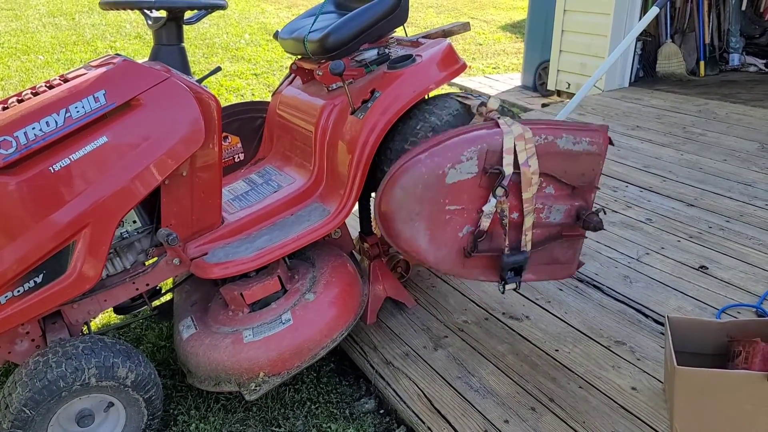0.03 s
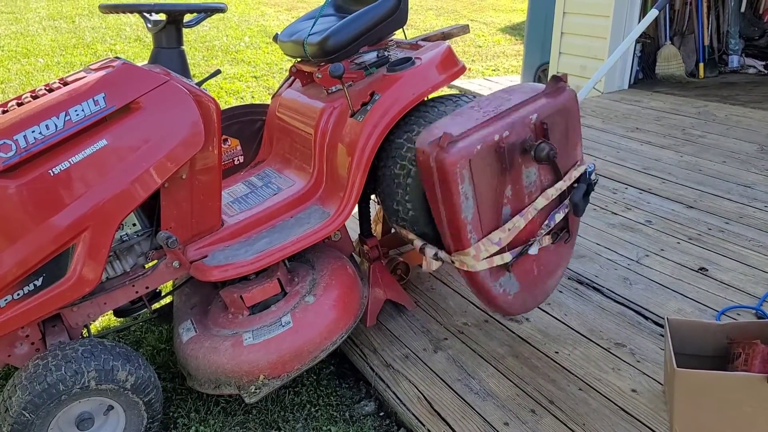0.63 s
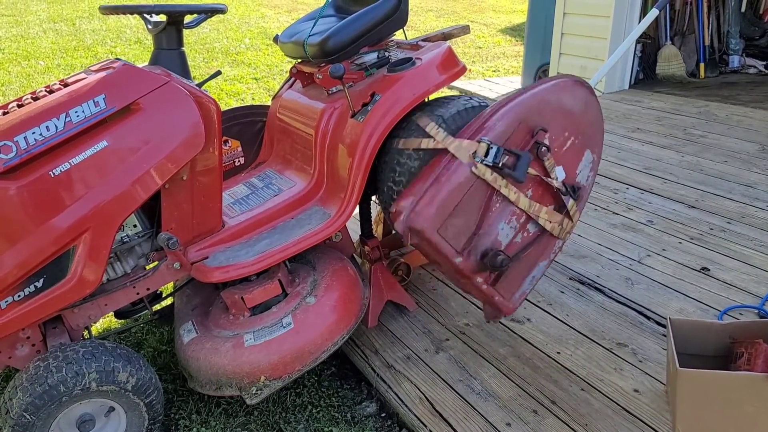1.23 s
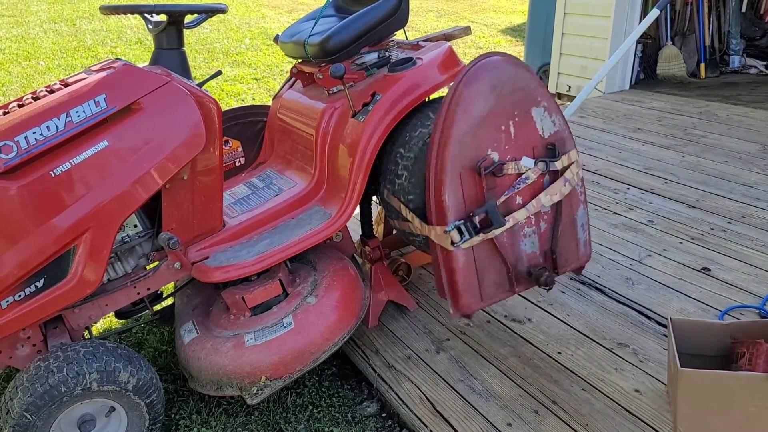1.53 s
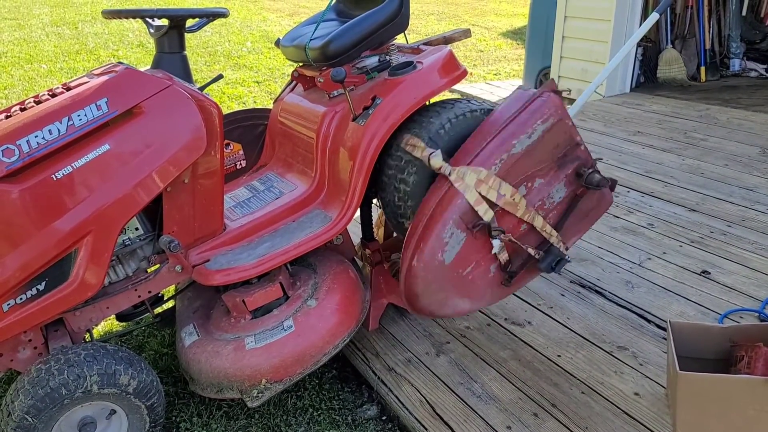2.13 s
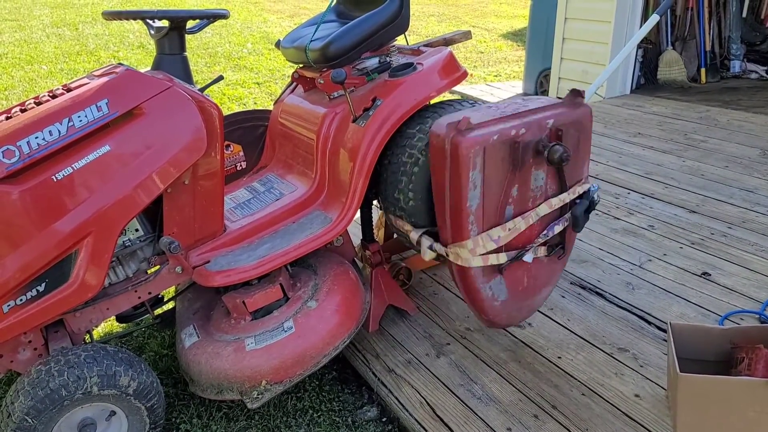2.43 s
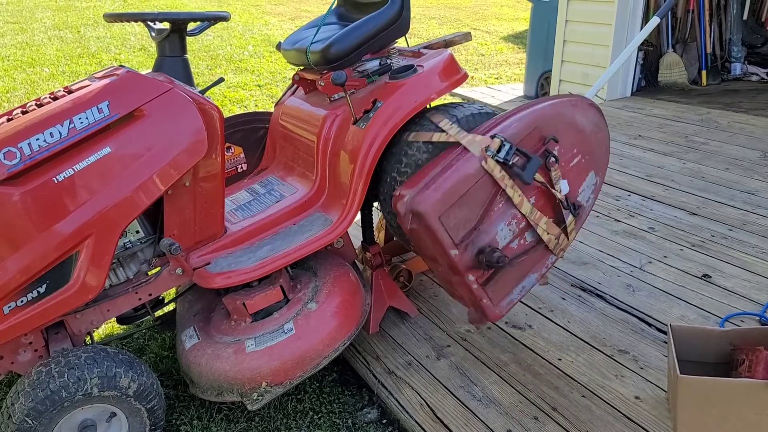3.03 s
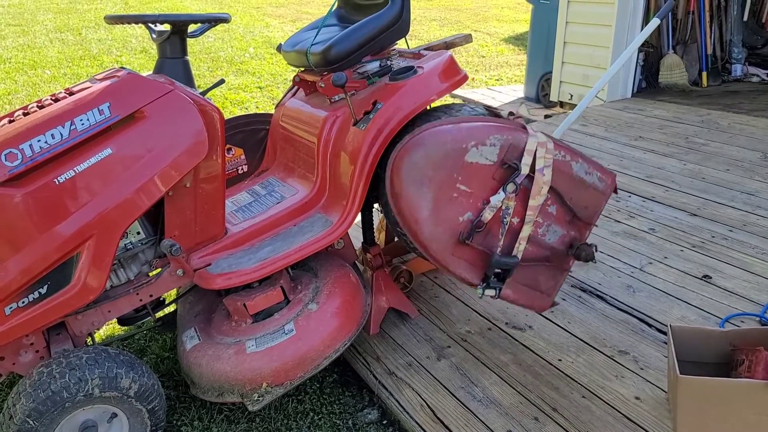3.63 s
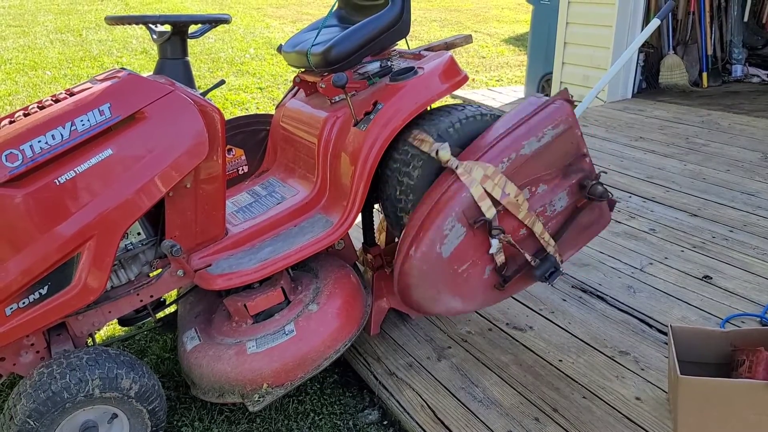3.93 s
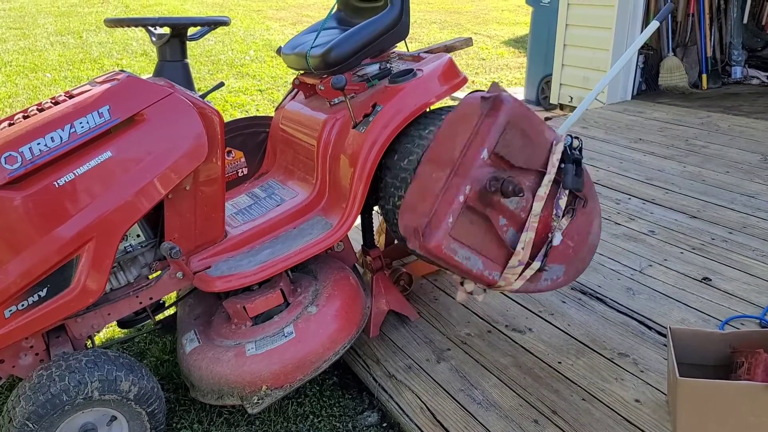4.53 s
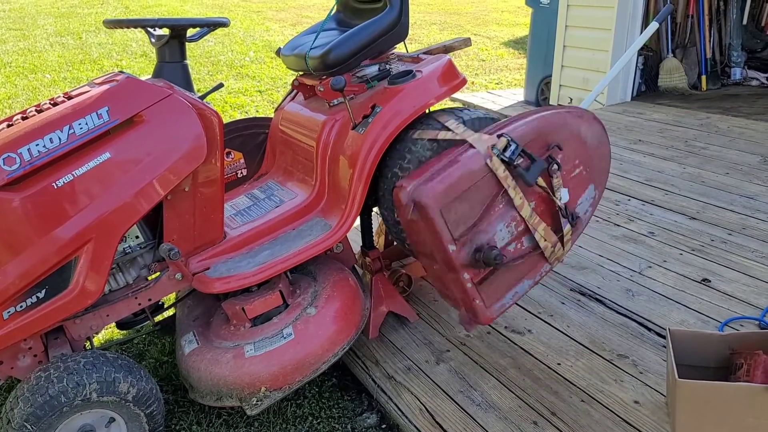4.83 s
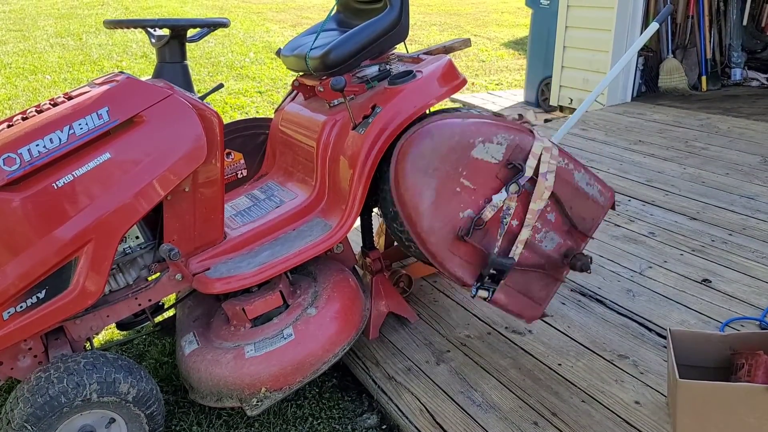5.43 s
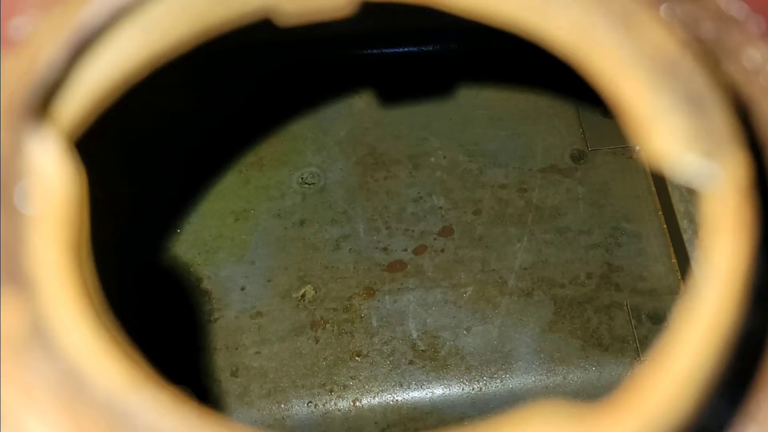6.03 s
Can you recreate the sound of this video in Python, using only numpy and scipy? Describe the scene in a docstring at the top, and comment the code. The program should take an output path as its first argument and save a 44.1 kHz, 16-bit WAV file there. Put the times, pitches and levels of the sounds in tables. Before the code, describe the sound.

A riding mower's single-cylinder engine idles outdoors, slightly to the left, with a fast low thudding and rattling metal panels. Straight ahead, metal pellets tumble inside a slowly turning steel fuel tank, sliding in bright hissing rushes and trickling in between. The pattern of rushes repeats about every two seconds. Both sounds carry on together, heard from nearby in stereo, then fade quickly at the end.

```python
"""A single cylinder thuds and clatters about 19 times a second, left of a pair of microphones: a riding
mower idling in gear, its firings pulsing through the silencer and its knocks ringing block and panels.
Straight ahead, a steel fuel tank full of metal pellets turns with the raised rear wheel it is strapped to.
The pellets slide down one wall after another in hissing rushes of tiny impacts, and trickle and roll
in between. The sound fades out at the end."""
import sys
import numpy as np
from scipy import signal
from scipy.fft import rfft, irfft
from scipy.io import wavfile
from scipy.ndimage import uniform_filter1d

SR = 44100
rng = np.random.default_rng(int(sys.argv[2]) if len(sys.argv) > 2 else 0)


def transcribe(signal):
    """Save signal, clipped to [-1, 1], as a 16-bit WAV file at the path in sys.argv[1]."""
    frames = np.atleast_2d(signal).T
    limited = np.clip(frames, -1, 1)
    pcm = np.round(limited * 32767).astype(np.int16)
    wavfile.write(sys.argv[1], SR, pcm)


N = 277389
TIME = np.arange(N) / SR
FFT_SIZE = 9 * 2 ** 15
FREQS = np.arange(FFT_SIZE // 2 + 1) * SR / FFT_SIZE
LEFT_RIGHT = np.array([[.5], [-.5]])  # splits a difference between the two microphones
FIRINGS_PER_TURN = 36  # geared to the engine, the tank turns once in about 1.85 s

# engine speed, wandering about its governed idle: t/s, firing rate/Hz
FIRING_RATE = [(0, 19.428), (1.25, 19.27), (1.65, 19.433), (2.55, 19.233), (3.2, 19.698), (5.05, 19.56),
               (5.45, 19.16)]
# response of the silencer: f/Hz, level/dB
SILENCER_RESPONSE = [(19, -63), (39, -12), (58, -7), (78, 1.5), (97, -0.3), (117, -8), (136, -3.5),
                     (156, 1), (175, -2.5), (195, -4), (214, -8.5), (233, -4.5), (248, -26), (600, -58.5)]
# lead of the left microphone on the engine: f/Hz, phase/rad
LEFT_MIC_LEAD = [(20, 17), (40, 0.45), (180, 0.39), (400, 0.62), (700, 0.69), (950, 1.92), (1500, 4.57),
                 (3000, 4.8)]

# the heap's slides in every turn: position/turn, level/dB, swell/s, hold/s, decay/s
HEAP_SLIDES = [(0.028, -20.5, 0.019, 0.23, 0.03), (0.098, -23, 0.0052, 0.035, 0.016),
               (0.304, -38.5, 0.036, 0.35, .05), (0.505, -19, 0.023, 0.24, 0.04),
               (.665, -15.5, .018, .035, .014), (.9, -25, .045, 0.11, .02),
               (0.963, -16.5, 0.027, 0.062, 0.048)]
# clumps of pellets dropping on a wall: t/s, level/dB, scatter time/s
CLUMP_DROPS = [(0.204, -13, 0.031), (.305, -17.5, 0.0098), (0.365, -23.5, 0.0088), (.54, -27, .01),
               (.590, -29, 0.012), (.866, -23, 0.033), (0.941, -17.5, 0.0066), (1.08, -21.5, 0.039),
               (1.16, -23, 0.02), (1.234, -15.5, 0.018), (1.398, -19.5, 0.018), (1.53, -28, 0.011),
               (1.63, -25, 0.063), (1.783, -17.5, 0.017), (1.84, -22.5, 0.018), (2.060, -10, 0.0083),
               (2.103, -13, 0.01), (2.159, -16, 0.011), (2.268, -23, 0.0054), (2.597, -26, 0.0069),
               (2.631, -21, 0.005), (2.729, -23.5, 0.005), (2.798, -31, 0.027), (2.977, -14.5, 0.0063),
               (3.035, -22.5, 0.01), (3.079, -17.5, 0.016), (3.251, -17.5, 0.012), (3.396, -26.5, 0.0079),
               (3.48, -28.5, 0.037), (3.68, -22.5, 0.034), (3.914, -14.5, 0.027), (4.012, -18, 0.015),
               (4.270, -29, 0.0073), (4.43, -27.5, 0.017), (4.615, -23, 0.026), (4.92, -21, 0.038),
               (5.081, -21.5, 0.02), (5.293, -27, 0.015), (5.451, -18, 0.016)]
# ring of the tank at each microphone: f/Hz, left level/dB, right level/dB
TANK_RESPONSE = [(353, -1, -6), (790, -1.5, -14.5), (1050, -13, 1.5), (1640, 0.5, 0), (2400, 1, -0.5),
                 (3240, 1.5, 2), (4270, -1, 0), (5410, 1.5, 3), (7200, -1, 6.5), (7700, 0, -3.5),
                 (9380, 0, -1), (9930, -1, 2), (13200, 0.5, 2), (15570, -3, 0)]
# hollow modes of the tank: f/Hz, width/Hz, level/dB
TANK_HOLLOW_MODES = [(1603, 24, -0.5), (1684, 44, 2.5), (1734, 13, 3.5), (1823, 19, -1.5)]
# the hollow ring grows as the heap runs over a flat wall: position/turn, level against the hiss/dB
HOLLOW_LEVEL = [(.08, -18), (.27, -5.5), (.55, -11), (.85, -28.5)]
# bright modes of the tank's seam: f/Hz, width/Hz, level/dB
TANK_SEAM_MODES = [(6770, 360, -11), (6830, 140, 16.5)]
# the seam sings when the heap first strikes a wall: position/turn, level against the hiss/dB
SEAM_LEVEL = [(.1, -22.5), (.44, -9.5), (.51, -7), (.59, -23), (.71, -28), (.76, -6), (.83, -28),
              (.98, -7.5)]

# knocks of piston, valves and gears: position/cycle, level/dB
CYCLE_KNOCKS = [(.01, -2), (.105, -0.5), (0.302, -4.5), (.405, 0), (.5, -3), (0.705, -7.5), (0.82, 0.5),
                (.87, 3.5), (0.945, -3)]
# response of the engine block and its covers: f/Hz, level/dB
BLOCK_RESPONSE = [(170, -24), (270, 6.5), (360, 3.5), (460, -1.5), (720, -5), (890, -4.5), (980, -14.5),
                  (1110, -13), (1330, -1.5), (1450, -16), (1610, -4.5), (2000, -16.5), (4000, -29),
                  (14000, -44)]
# the clatter across the microphones: f/Hz, left minus right level/dB
CLATTER_BALANCE = [(380, 7.5), (540, 10), (740, 7), (900, 0), (1300, 5), (1600, -0.5), (2000, -1.5)]
# modes of the mower's panels: f/Hz, width/Hz, level/dB
PANEL_MODES = [(557, 14, -1), (624.8, 38, -4), (683, 66, -4.5), (739.5, 40, -7.5), (807, 31, -14.5),
               (851, 5, -11.5), (857, 120, -5.5)]
# the panels' ring swells and sinks twice a turn: position/turn, level/dB
PANEL_LEVEL = [(.12, -29), (.35, -26.5), (.55, -24), (.72, -28), (.88, -25.5)]
# mode of one loose panel: f/Hz, width/Hz, level/dB
LOOSE_PANEL_MODE = [(721, 95, -3)]
# the loose panel rattles in swells: t/s, level/dB
RATTLE_LEVEL = [(0, -29.5), (.5, -28.5), (.72, -25.5), (1.15, -26.5), (1.4, -31.5), (2.25, -30),
                (2.48, -26), (2.88, -28.5), (3.22, -36), (3.42, -31), (3.9, -30.5), (4.6, -29), (5.0, -37),
                (5.33, -23.5), (5.6, -28.5)]
# modes of the tin shroud over the engine: f/Hz, width/Hz, level/dB
TIN_SHROUD_MODES = [(1220, 34, -12.5), (1292, 17, -0.5), (1312, 26, 1), (1399, 20, -0.5)]
# one knock harder than the rest: t/s, level/dB
HARD_KNOCK = [(2.504, -14.5)]

# the crankcase's even drone: f/Hz, level/dB
CRANKCASE_RESPONSE = [(200, -26.5), (250, -4), (272, -0.5), (310, -0.5), (332, 2), (352, -.5), (390, 3),
                      (430, -2.5), (480, -0.5), (515, -5), (560, 2), (600, 1), (660, -9.5), (900, -15.5),
                      (1050, -34.5)]
# ring of the wall under rolling pellets: f/Hz, level/dB
ROLLING_RESPONSE = [(1200, -1), (2300, 6), (2750, 8), (3000, 9.5), (3250, 6), (3400, 11), (3560, -4.5),
                    (3880, 3), (4450, 1.5), (5000, 5), (5430, 9.5), (5900, 2), (6800, 5), (7600, -5),
                    (11000, -1.5), (14000, -9.5), (15500, -14)]
# the rolling lulls whenever a slide has come to rest: position/turn, level/dB
ROLLING_LEVEL = [(.12, -31.5), (.24, -35), (.35, -32), (.6, -33.5), (.68, -43), (0.734, -35), (.88, -33)]
# closing fade: t/s, level/dB
FADE_OUT = [(5.6, -0.5), (5.66, -4.5), (5.70, -13.5), (5.735, -28), (5.76, -108), (5.8, -140)]


def exhaust(crank):
    """Each firing sends a pulse through the silencer, over a weak rumble of gas."""
    pulses = -each_cycle(crank, share=.09)  # the exhaust opens
    gas = undb(-16.5) * rng.standard_normal(N)
    return undb(-18.5) * unit(through(unit(pulses) + gas, causal(spectrum(SILENCER_RESPONSE))))


def sliding_pellets(crank):
    """Pellets strike the tank and ring its walls, hollow and seam; each microphone gets its own hiss."""
    power = pellet_flow(crank)
    impacts = pellet_impacts(power)
    walls = np.array([causal(spectrum(TANK_RESPONSE, column)) for column in (1, 2)])
    # the moving heap wakes now one hollow mode, now another
    hollow = sum(through(impacts, resonances([mode])) * undb(4.9 * walk(7))
                 for mode in TANK_HOLLOW_MODES)
    hollow = unit(hollow) * undb(each_turn(crank, HOLLOW_LEVEL))
    seam = unit(through(impacts, resonances(TANK_SEAM_MODES))) * undb(each_turn(crank, SEAM_LEVEL))
    hiss = unit(heap_damping(through(impacts, walls)))
    return (hiss + hollow + seam) * np.sqrt(np.mean(power)) * undb(2.1)


def pellet_flow(crank, clump_swell_s=.003):
    """Power of the moving pellets: each slide comes at its angle of the tank, and clumps drop on top."""
    turn = turns(crank)
    turn_s = FIRINGS_PER_TURN / curve(FIRING_RATE)
    power = undb(-42) ** 2  # a few pellets are always trickling
    for share, db, swell_s, hold_s, decay_s in HEAP_SLIDES:
        age = ((turn - share + .5) % 1 - .5) * turn_s
        envelope = np.exp(np.minimum(age, 0) / swell_s - np.maximum(age - hold_s, 0) / decay_s)
        power += undb(db) ** 2 * envelope
    power *= undb(1.3 * walk(45)) ** 2
    for start, db, scatter_s in CLUMP_DROPS:
        age = np.maximum(TIME - start, 0)
        power += undb(db) ** 2 * (1 - np.exp(-age / clump_swell_s)) * np.exp(-age / scatter_s)
    return power


def pellet_impacts(power, patches=12):
    """Thousands of tiny impacts on patches of tank wall; a faster flow brings more of them."""
    hits_per_s = 8000 * (power / undb(-18)) ** .58
    # the heap wanders from patch to patch, so the ring keeps changing
    shares = np.array([undb(9 * walk(5)) for _ in range(patches)])
    impacts = 0
    for share in shares / shares.sum(axis=0):
        hits = rng.random(N) < hits_per_s * share / SR
        sizes = rng.standard_normal(N) * undb(.88 * np.minimum(rng.exponential(size=N), 5))
        tail = .66 * ring(t60=.0011) + ring(t60=.085)  # a tick of contact, then the steel rings on
        impacts += strike(hits * sizes * np.sqrt(power / hits_per_s), tail)
    return impacts


def heap_damping(sound, depth_db=1.5, rate_hz=22, bands=32):
    """The heap damps ever different parts of the wall: each band swells and sinks by itself."""
    centres_hz = np.geomspace(1500, 14000, bands)
    return sum(through(sound, np.interp(FREQS, centres_hz, band)) * undb(depth_db * walk(rate_hz))
               for band in np.eye(bands))


def knocks_and_buzz(crank, buzz_decay_s=.0011):
    """Piston, valves and gears knock in every cycle; each blow sets the covers buzzing briefly."""
    knocks, blow_power = 0, 0
    for share, db in CYCLE_KNOCKS:
        blows = undb(db) * each_cycle(crank, share)
        knocks += strike(blows, ring(t60=.037, channels=1))
        blow_power += blows ** 2
    shake = np.sqrt(signal.lfilter([1], [1, -np.exp(-1 / (buzz_decay_s * SR))], blow_power))
    return unit(knocks), unit(shake * rng.standard_normal(N))


def clatter(crank, knock_cut_hz=545, noise_cut_hz=850):
    """Knocks, buzz and fan noise ring the block, the panels and the tin shroud."""
    knocks, buzz = knocks_and_buzz(crank)
    # fan noise and reflections off the deck reach each microphone separately
    fan = rng.standard_normal((2, N))
    deck = unit(strike(knocks[0], ring(t60=.058)))
    balance = undb(spectrum(CLATTER_BALANCE) * LEFT_RIGHT)
    knock_highpass = 1 / np.sqrt(1 + (knock_cut_hz / (FREQS + 1)) ** 20)
    noise_highpass = FREQS ** 3 / np.hypot(FREQS ** 3, noise_cut_hz ** 3)

    block_knocks = through(whiten(knocks + undb(2.5) * deck), knock_highpass)
    block_noise = through(undb(2) * buzz + undb(4.5) * fan, noise_highpass)
    block = through(undb(5) * block_knocks + block_noise, causal(spectrum(BLOCK_RESPONSE)) * balance)

    panel_knocks = through(whiten(knocks + undb(-5) * deck), knock_highpass)
    drive = panel_knocks + undb(-9) * buzz + undb(-12) * fan
    panels = through(drive, resonances(PANEL_MODES) * balance)
    loose_response = resonances(LOOSE_PANEL_MODE) * resonances([(730, 170, 0)])
    rattle = through(drive + undb(-8.5) * buzz, loose_response * balance) * undb(1.5 * walk(18))
    shroud = through(drive + buzz, resonances(TIN_SHROUD_MODES) * balance)
    return (undb(-23.5) * unit(block)
            + undb(each_turn(crank, PANEL_LEVEL)) * unit(panels)
            + undb(curve(RATTLE_LEVEL)) * unit(rattle)
            + undb(-36.5) * unit(shroud))


def hard_knock(decay_s=.01):
    """A single harder knock barks through the block and the loose panel."""
    [(start, db)] = HARD_KNOCK
    age = np.maximum(TIME - start, 0)
    push = (age > 0) * np.exp(-age / decay_s) * rng.standard_normal(N)
    block = causal(spectrum(BLOCK_RESPONSE)) * FREQS / np.hypot(FREQS, 600)
    bark = through(push, block + 2 * resonances(LOOSE_PANEL_MODE))
    return undb(db) * bark / np.abs(bark).max()


def crankcase_drone(crank):
    """Every firing shakes the crankcase; smeared in time, the blows hum evenly over a rough rumble."""
    smears = np.exp(1j * np.angle(rfft(ring(t60=.3, channels=3), FFT_SIZE)))
    blows = through(each_cycle(crank, share=.1413), smears)  # just after the exhaust opens
    direct, deck_echoes = blows[0], blows[1:]
    hum = whiten(direct + undb(-6) * deck_echoes)
    rumble = undb(-4.5) * rng.standard_normal((2, N))
    return undb(-28.5) * unit(through(hum + rumble, undb(spectrum(CRANKCASE_RESPONSE))))


def rolling_pellets(crank):
    """Pellets roll along the lowest wall all the time: a smooth, duller wash behind the hiss."""
    scrape = rng.standard_normal(N) * undb(walk(30))
    wash = through(strike(scrape, ring(t60=.041)), causal(spectrum(ROLLING_RESPONSE)))
    return undb(each_turn(crank, ROLLING_LEVEL)) * unit(wash)


def each_cycle(crank, share, spread_db=.6, jitter_s=.00003):
    """One impulse per engine cycle at the given share of it, a little uneven in size and time."""
    time_scatter, size_scatter = rng.standard_normal((128, 2)).T
    when = np.interp(np.arange(len(time_scatter)) + share, crank, TIME, left=-1, right=-1)
    at = ((when + jitter_s * time_scatter) * SR).astype(int)
    inside = (at >= 0) & (at < N)
    return np.bincount(at[inside], undb(spread_db * size_scatter[inside]), N)


def turns(crank):
    """How many turns the tank has made."""
    return (crank - crank[0]) / FIRINGS_PER_TURN


def each_turn(crank, rows):
    """Rows (position/turn, value) joined by straight lines, the same in every turn."""
    return np.interp(turns(crank), *np.transpose(rows), period=1)


def ring(t60, channels=2, size=4096):
    """Dense modes of sheet metal: a tail of unit energy that falls 60 dB in t60 seconds."""
    tail = rng.standard_normal((channels, size)) * np.exp(-np.log(1000) * TIME[:size] / t60)
    return tail / np.sqrt(np.sum(tail ** 2, axis=1, keepdims=True))


def strike(blows, tail):
    """Every blow sets off the tail."""
    return signal.oaconvolve(blows[None], tail, axes=1)[:, :N]


def resonances(modes):
    """Response of modes (f/Hz, width/Hz, level/dB); neighbours swing in opposite directions."""
    return sum((-1) ** k * undb(db) * 1j * FREQS * width / (hz ** 2 - FREQS ** 2 + 1j * FREQS * width)
               for k, (hz, width, db) in enumerate(modes))


def causal(db):
    """The response of a body with this gain: it rings after a blow, never before."""
    cepstrum = irfft(np.log(undb(db)))
    cepstrum[1:FFT_SIZE // 2] *= 2
    cepstrum[FFT_SIZE // 2 + 1:] = 0
    return np.exp(rfft(cepstrum))


def whiten(x, bins=135):
    """Even out the engine's overtones, so that the ringing bodies set their colour."""
    whole = rfft(x, FFT_SIZE)
    power = uniform_filter1d(np.abs(whole) ** 2, bins, axis=-1)
    return unit(irfft(whole / np.sqrt(power + power.mean() / 100))[..., :N])


def through(x, response):
    """Pass a sound through a frequency response."""
    return irfft(rfft(x, FFT_SIZE) * response)[..., :N]


def spectrum(rows, column=1):
    """One column of rows (f/Hz, ...) joined on a log-frequency axis."""
    rows = np.array(rows)
    return np.interp(np.log(FREQS + 1), np.log(rows[:, 0]), rows[:, column])


def curve(rows):
    """Rows (t/s, value) joined by straight lines."""
    return np.interp(TIME, *np.transpose(rows))


def walk(rate_hz):
    """Slow random drift with a spread near 1."""
    hold = int(SR / rate_hz)
    steps = np.repeat(rng.standard_normal(N // hold + 1), hold)
    return 1.3 * uniform_filter1d(steps, hold)[:N]


def undb(db):
    """Decibels to gain."""
    return 10 ** (np.asarray(db) / 20)


def unit(x):
    """Scale to rms 1."""
    return x / np.sqrt(np.mean(x ** 2))


def scene():
    """The engine stands to the left of the microphones; the tank turns straight ahead."""
    crank = np.cumsum(curve(FIRING_RATE)) / SR + .412  # running count of engine cycles
    engine = exhaust(crank) + crankcase_drone(crank) + clatter(crank) + hard_knock()
    mic_phase = np.exp(1j * spectrum(LEFT_MIC_LEAD) * LEFT_RIGHT)
    return through(engine, mic_phase) + sliding_pellets(crank) + rolling_pellets(crank)


def record(dry):
    """The rare highest peaks are rounded off, the sound fades out, and the top is cut."""
    ceiling, top_hz = .8, 15450
    rounded = dry / (1 + (dry / ceiling) ** 8) ** (1 / 8)
    lowpass = signal.ellip(10, .2, 80, top_hz, fs=SR, output="sos")
    return signal.sosfilt(lowpass, rounded * undb(curve(FADE_OUT)))


dry = scene()
out = record(dry)
transcribe(out)
```